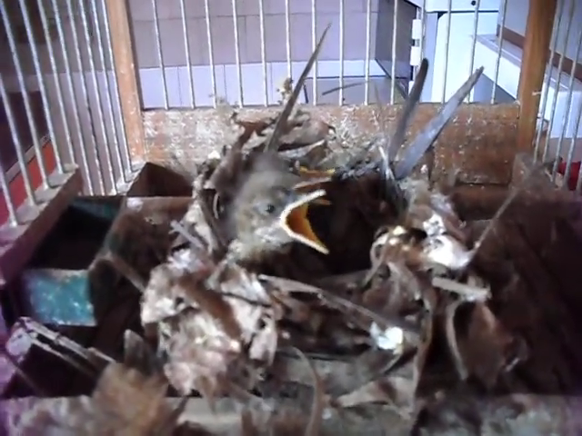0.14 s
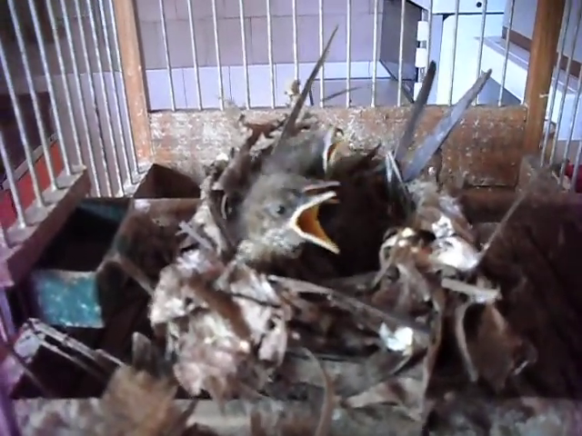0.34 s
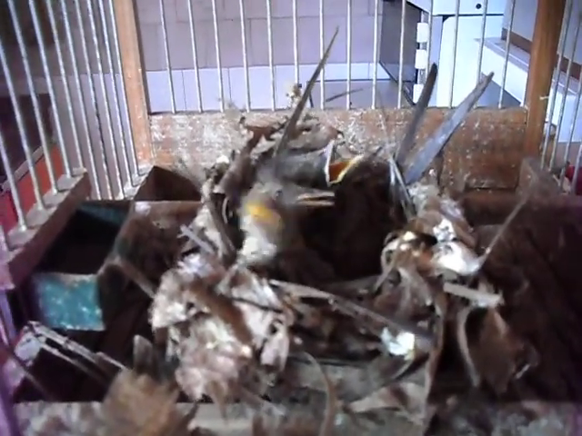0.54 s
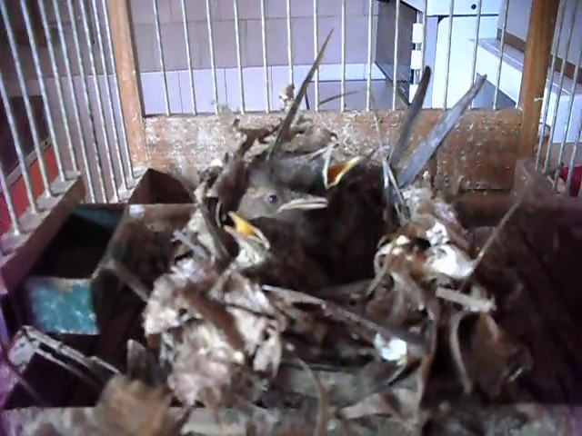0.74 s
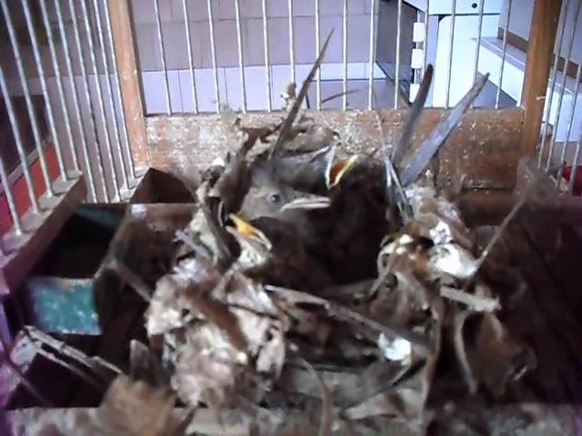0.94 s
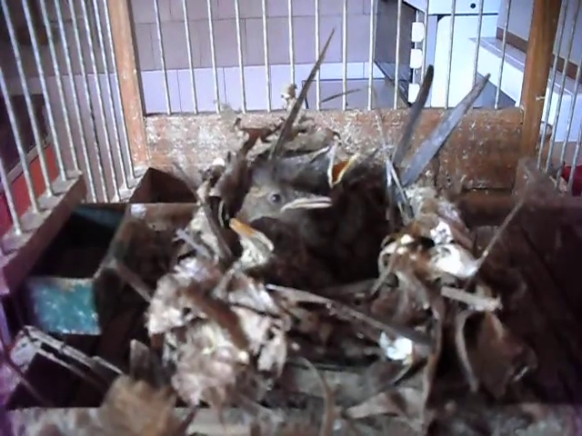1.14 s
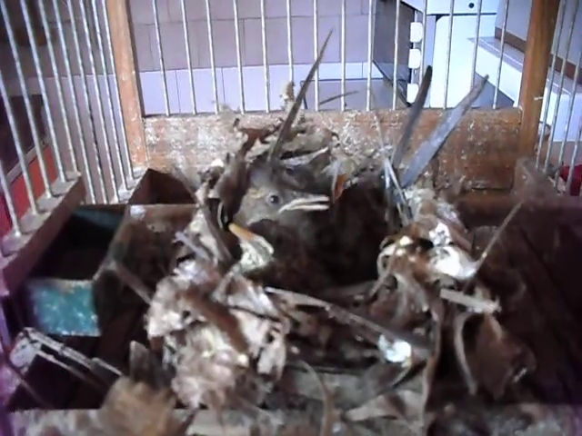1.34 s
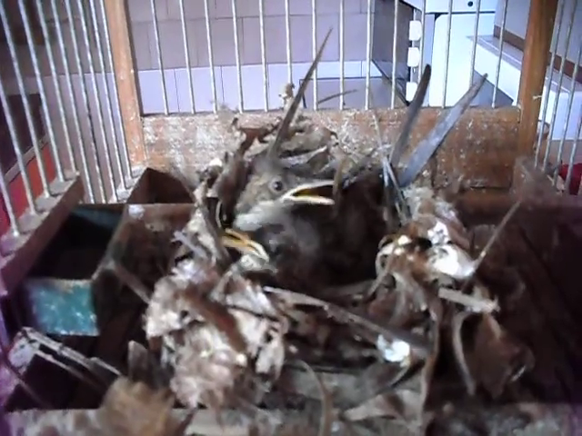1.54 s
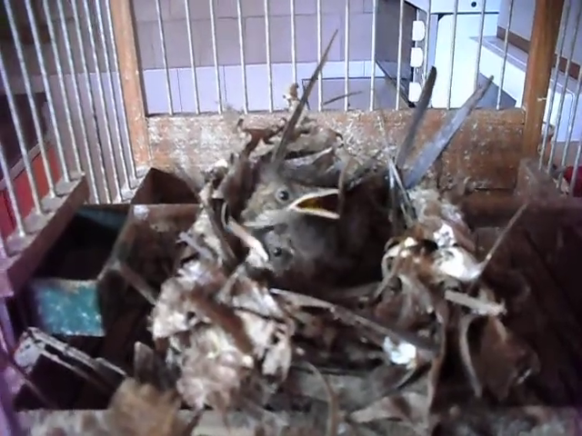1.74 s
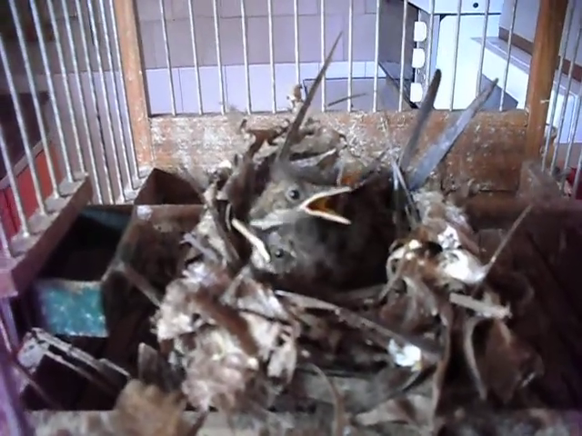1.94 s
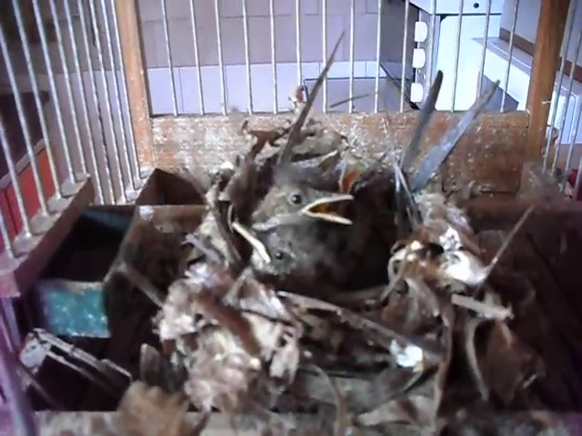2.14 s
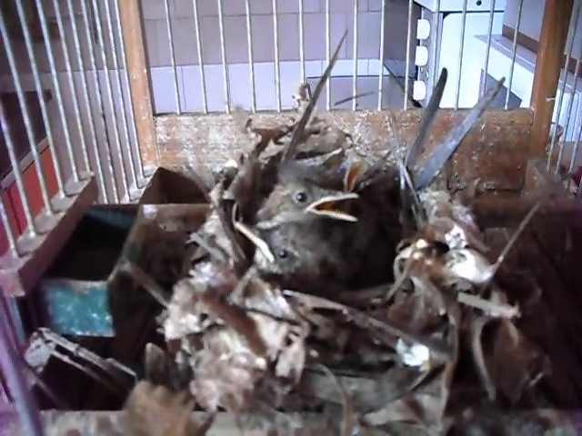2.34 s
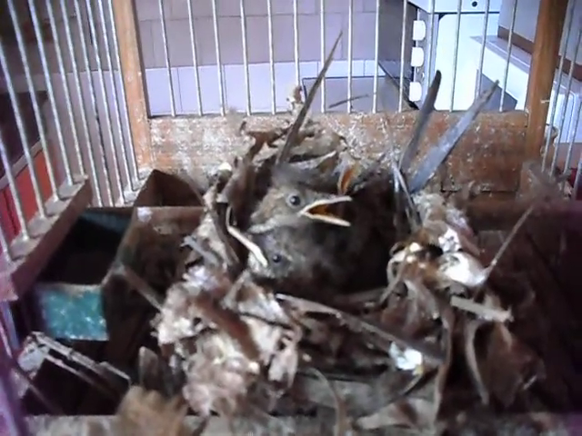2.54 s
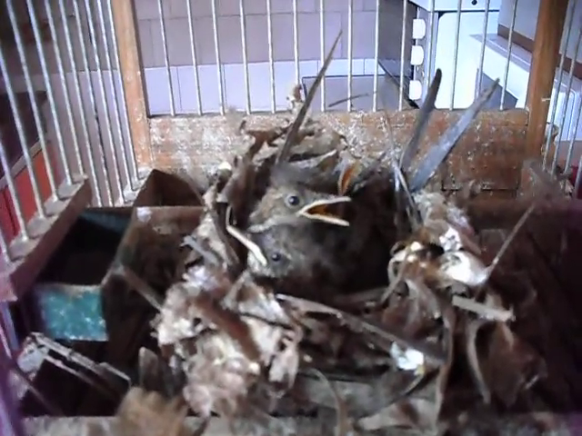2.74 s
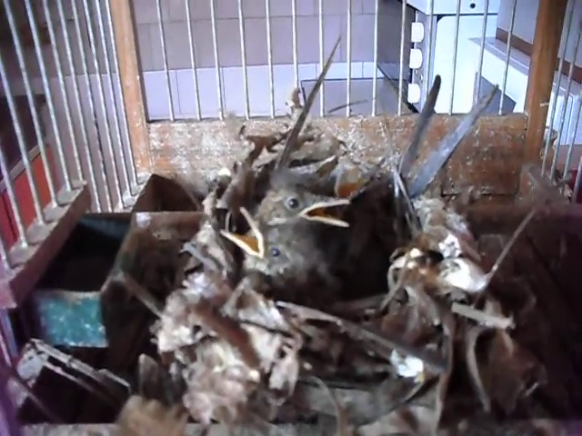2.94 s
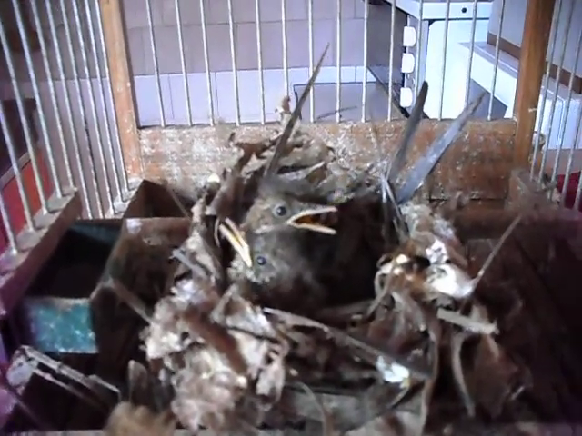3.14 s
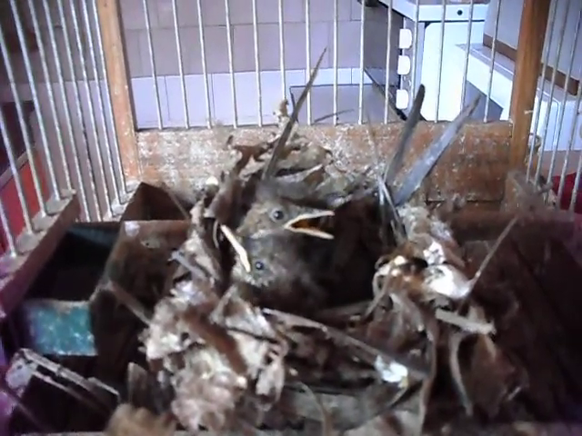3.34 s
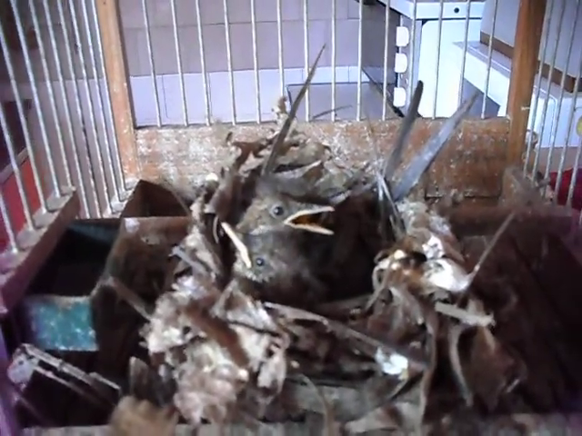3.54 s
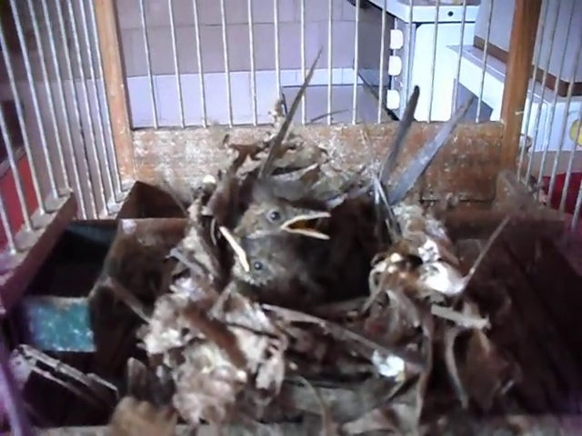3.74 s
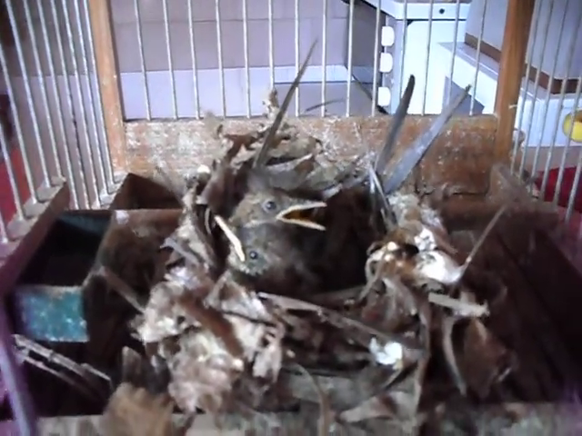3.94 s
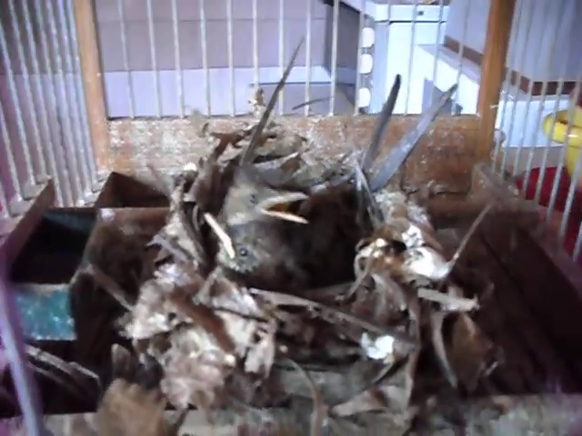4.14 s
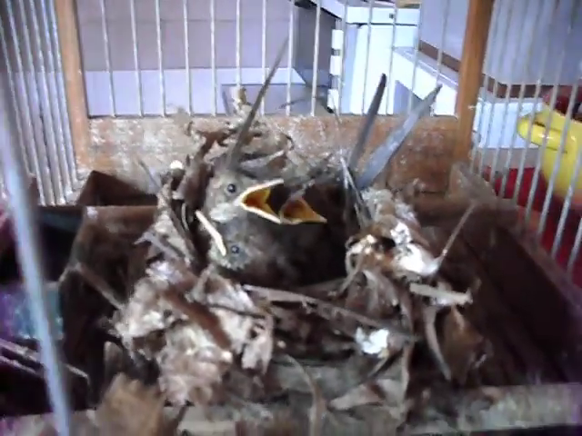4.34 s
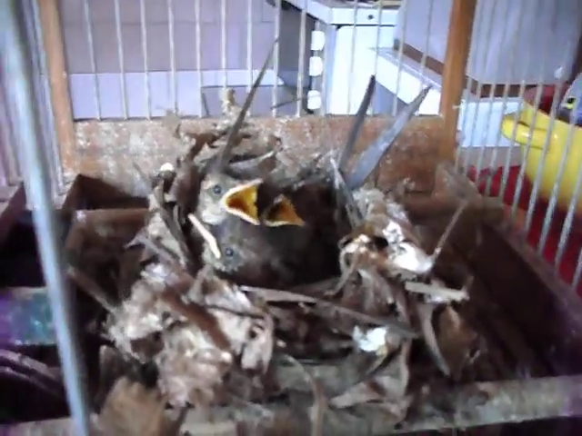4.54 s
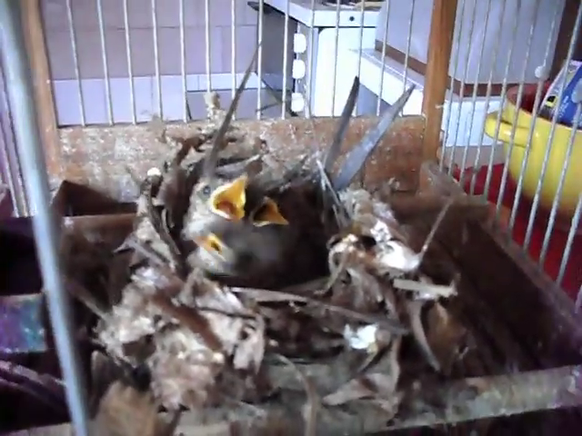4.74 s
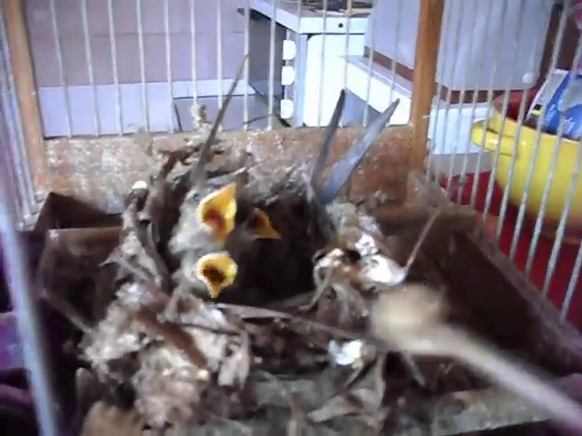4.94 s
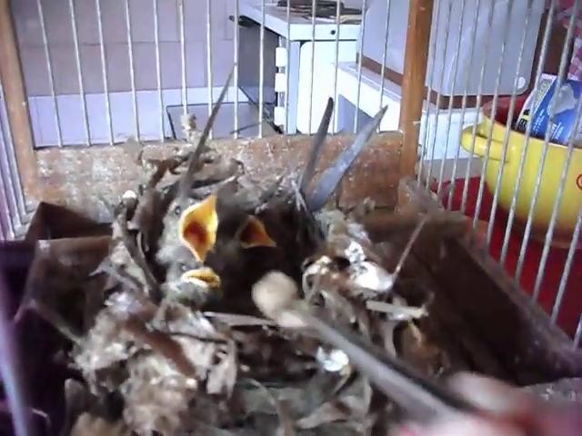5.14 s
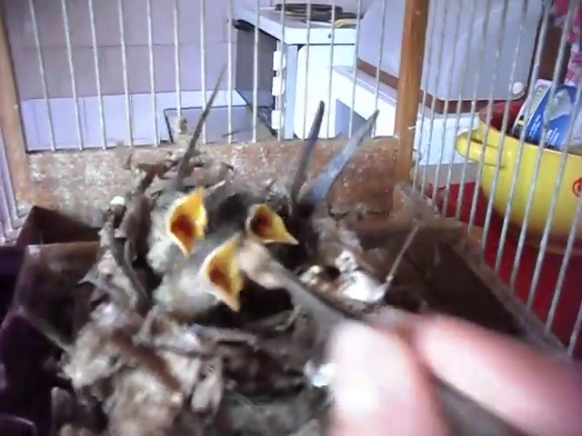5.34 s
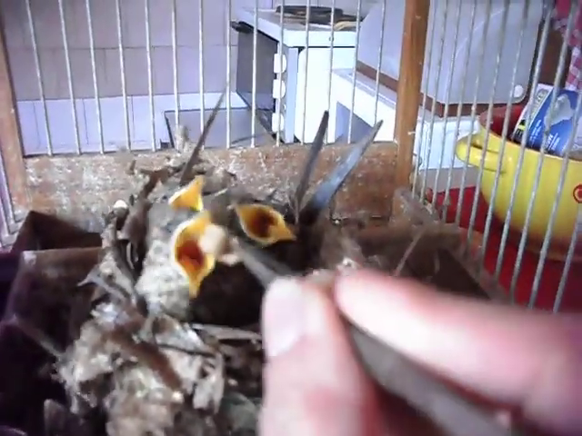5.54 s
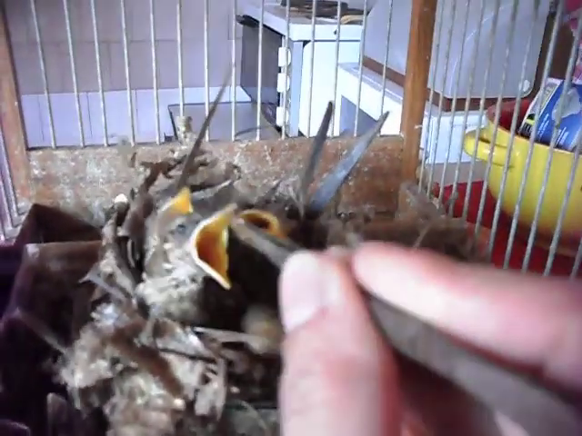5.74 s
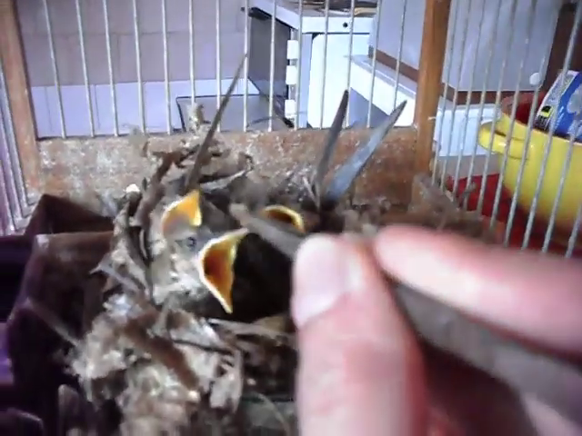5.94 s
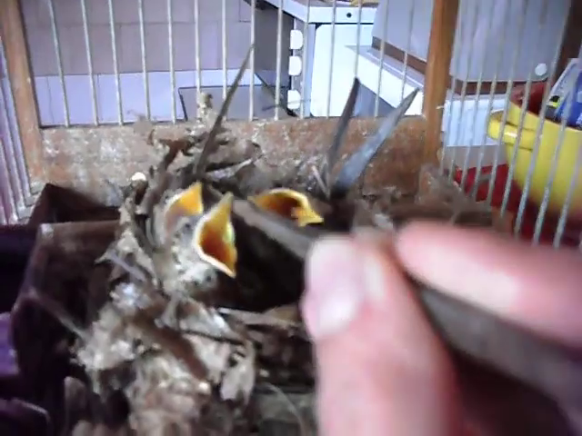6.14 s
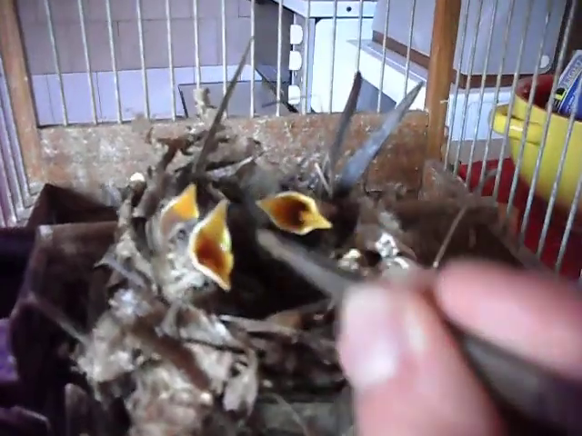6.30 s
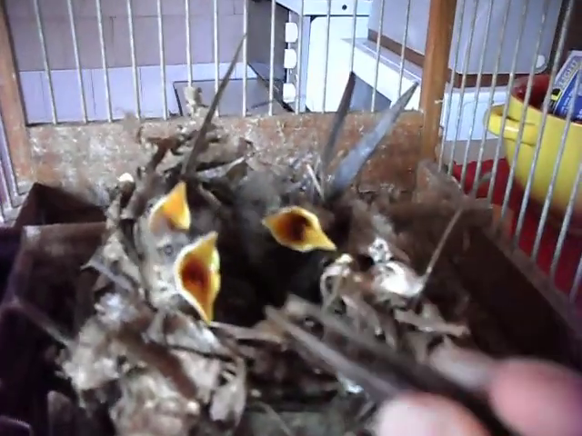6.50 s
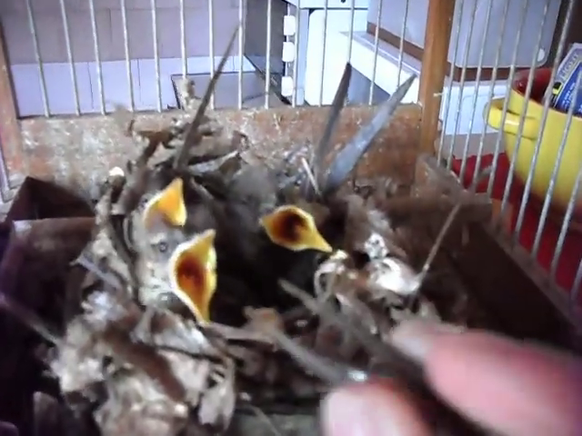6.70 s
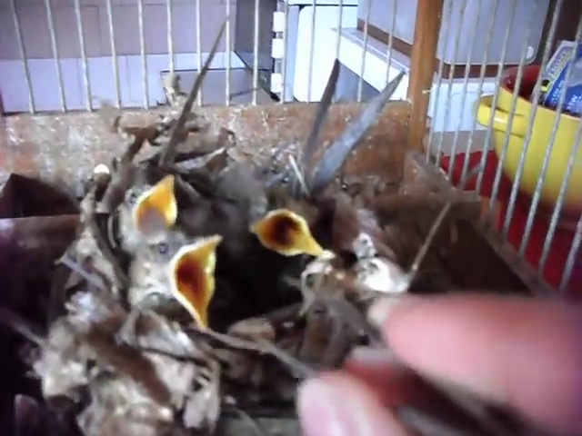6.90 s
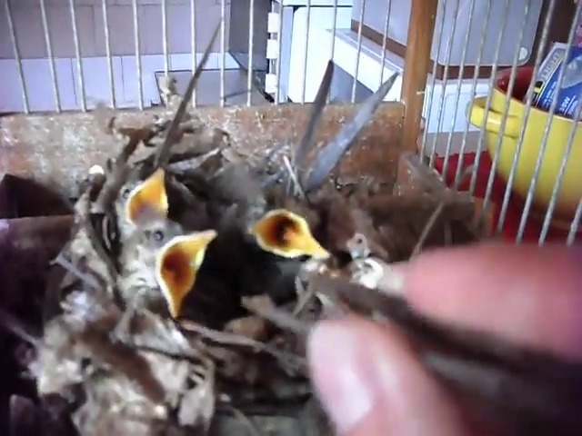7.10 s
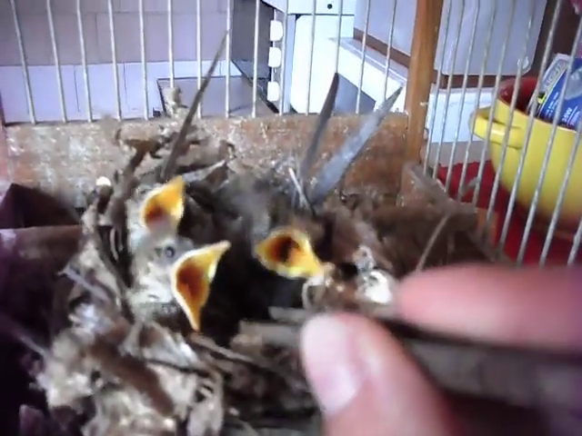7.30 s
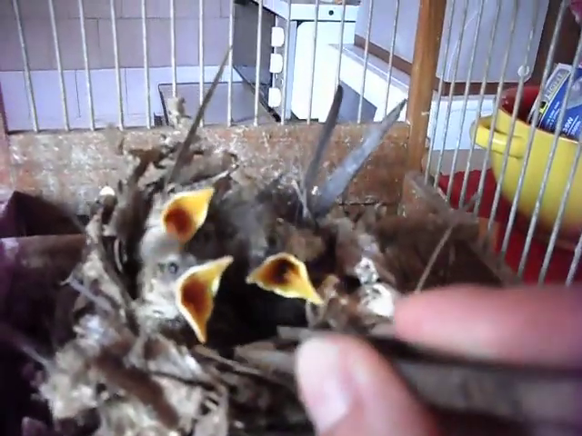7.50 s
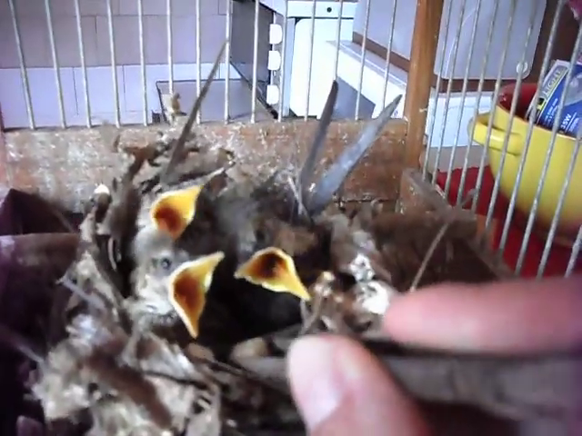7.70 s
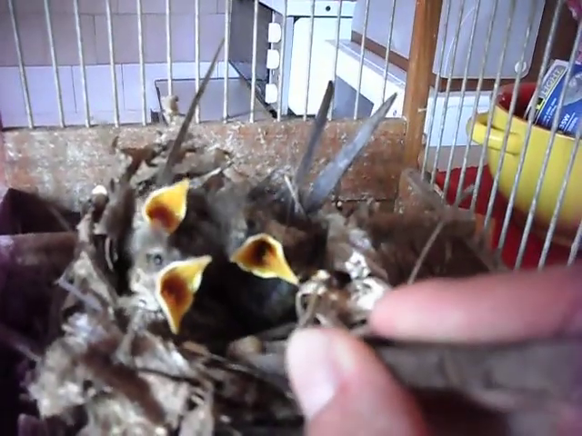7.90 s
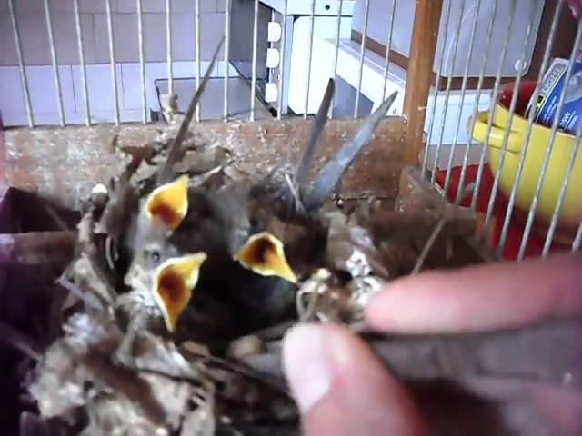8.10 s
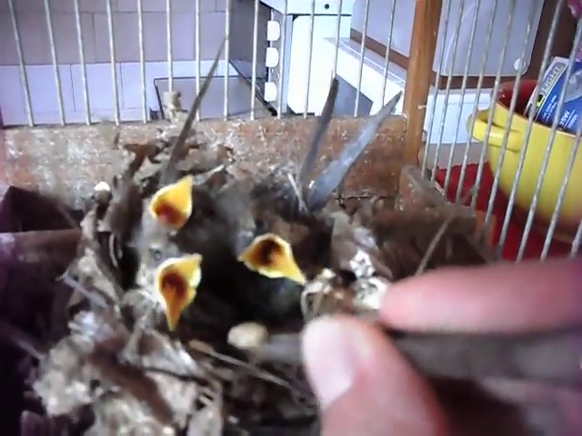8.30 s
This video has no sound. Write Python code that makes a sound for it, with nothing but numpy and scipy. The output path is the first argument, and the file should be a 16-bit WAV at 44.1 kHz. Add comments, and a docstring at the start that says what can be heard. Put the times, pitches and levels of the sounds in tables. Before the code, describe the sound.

Close, bright cheeping from chicks in a nest box: quick buzzy strokes sliding from very high pitch, a few thin held whistles, and quiet gaps. Later the calls crowd together at about fifteen a second or less, unbroken. Short box echoes, a small dry room, a modest microphone with dulled top and steady low rumble.

```python
"""Begging nestlings

Chicks in a nest chirp close by while tweezers offer food; their chirps overlap in a long late bout with a faint rasp.
In each chirp two syrinx voices swing in pitch some 33 times a second: a steep opening stroke, a full crown, dying arches.
Thin peeps are held whistles, faint slurs are falling tones, and two tweezer taps ring short damped modes.
Echoes off the nest box and decaying noise for a small room follow the sounds, over a low hum and hiss."""
import sys
import numpy as np
from scipy import signal
from scipy.fft import rfft, irfft, next_fast_len
from scipy.io import wavfile
from scipy.ndimage import uniform_filter1d

SR = 44100
rng = np.random.default_rng(int(sys.argv[2]) if len(sys.argv) > 2 else 0)


def persist_wave(psi):
    """Save psi, clipped to +-1, as 16-bit WAV."""
    counts = np.round(np.clip(psi, -1, 1) * 32767).astype(np.int16)
    wavfile.write(sys.argv[1], SR, np.atleast_2d(counts).T)


N = 373086  # samples in the scene

# Spectrum of the steady hiss and rumble before a rumble cut: frequency_hz, relative_density_db [dB per Hz]
FLOOR = [(12, -50), (20, 9), (37, -1), (54, -7), (315, -15), (441, -18.5), (503, -19), (705, -19),
         (1010, -20), (3270, -29.5), (6100, -32), (6600, -30.5), (8120, -34.5), (10000, -31), (13000, -42),
         (22000, -120)]
# Steady hum of an appliance: frequency_hz, rms_level_db
HUM = [(30.2, -50), (60.3, -59.5), (120.4, -73.5)]

# Begging chirps, one a row: first_apex_s, beat_s [apex to apex], opening_pitch_hz, crown_pitch_hz, opening_level_db,
# crown_level_db, fade_db [per later beat], lower_voice_relative_level_db, snap [0 drawn out - 1 clipped]
CHIRPS = [(.0452, 0.03, 11150, 9160, -15.5, -9, -19.5, -11, 0.15),
          (.2064, 0.037, 10720, 7240, -16, -18.5, -15, -10, 0.42),
          (.2214, 0.036, 11040, 9280, -17, -25, -25, -2, 0.46),
          (.3438, 0.022, 9100, 9900, -13, -25, -16, -3, 0.59),
          (.3734, 0.03, 9600, 8780, -32, -24.5, -13.5, -4, 0.16),
          (.500, 0.025, 7400, 6000, -6.5, -19.5, -26, -13.5, 0.72),
          (.529, 0.032, 10500, 8360, -22, -21, -17.5, -9, 0.2),
          (.687, 0.031, 9180, 8310, -27, -23.5, -34, -1.5, 0.015),
          (.847, 0.032, 9160, 8630, -22.5, -21, -29, -4.5, 0.53),
          (.9976, 0.028, 10120, 9820, -17, -15, -20, -10, 0.96),
          (1.117, 0.027, 8740, 7430, -16.5, -18, -10, -22, 0.38),
          (1.2664, 0.033, 9160, 7800, -25.5, -23, -23, -4, 0.075),
          (1.476, 0.028, 7140, 6600, -19.5, -21.5, -16, 1, 0.94),
          (2.015, 0.029, 8000, 8430, -30.5, -24.5, -27, -2, 0.037),
          (2.160, 0.03, 9400, 7970, -25.5, -23.5, -31, -2, 0.19),
          (2.796, 0.025, 7320, 7830, -22.5, -17, -39, -17, 0.27),
          (2.898, .0294, 10460, 9340, -26, -22, -34, 7, 0),
          (2.9274, 0.032, 8000, 9030, -47, -19, -28, 5, 0),
          (3.005, 0.03, 10500, 8470, -19.5, -19.5, -39, 4, 0.085),
          (3.113, 0.031, 10200, 7080, -9.5, -11.5, -24, -2, .75),
          (3.208, 0.026, 8700, 5950, -10.5, -42, -22, -4.5, 0.85),
          (3.2705, .025, 5050, 4550, -21, -23.5, -25, 8.5, 0.74),
          (4.175, 0.021, 7540, 8300, -21.5, -34, -42, -11, 0),
          (4.313, 0.029, 7960, 8590, -30, -24.5, -12.5, -3, 0.018),
          (4.670, 0.029, 11600, 10000, -31.5, -24.5, -34, 1, 0.27),
          (4.7856, 0.031, 11560, 10150, -17, -11.5, -18, -6.5, 0.053),
          (4.896, 0.023, 11640, 9880, -14, -10.5, -27, -5.5, 0.12),
          (5.047, 0.031, 10900, 9140, -13.5, -16, -29, 1.5, 0.5),
          (5.159, .0285, 8870, 7520, -10, -13.5, -15, -3.5, .7),
          (5.229, 0.039, 10160, 8400, -18.5, -31.5, -19, -3, 0.3),
          (5.314, 0.021, 8600, 8340, -22.5, -16, -19, -7.5, 0.051),
          (5.350, 0.016, 12300, 7920, -14, -16.5, -13, -7, 0),
          (5.3774, 0.025, 9020, 9000, -20, -20, -6, -13, 0.1),
          (5.4326, 0.041, 8800, 9040, -18, -21, -6, -22, 0.049),
          (5.4568, 0.027, 10600, 7960, -14.5, -19, -21, -9, 0.072),
          (5.541, 0.025, 11400, 11680, -19, -15.5, -10, -11.5, 0.098),
          (5.573, 0.028, 10450, 9300, -14, -15, -10, -11, 0.14),
          (5.677, 0.019, 11840, 11980, -19, -14, -14, -12.5, 0.083),
          (5.7126, 0.025, 10500, 8590, -17, -17.5, -8.5, -9.5, 0.0068),
          (5.810, 0.025, 11220, 11300, -19.5, -15, -19, -10, 0.023),
          (5.848, 0.026, 10830, 9200, -19, -17.5, -11, -7.5, 0.14),
          (5.933, .030, 12000, 10180, -17.5, -14.5, -24, -16, 0.027),
          (5.982, 0.027, 10650, 8800, -20.5, -20, -8, -7, 0.041),
          (6.055, 0.029, 11900, 10090, -17.5, -15.5, -20, -27, 0),
          (6.110, 0.026, 10900, 8340, -17.5, -16.5, -8, -17, 0.022),
          (6.179, 0.028, 11400, 9820, -15.5, -16, -18, -21, 0.058),
          (6.247, 0.028, 11600, 7920, -14.5, -16, -9.5, -14.5, 0.07),
          (6.299, 0.032, 12140, 10700, -13, -14, -22, -21, 0.18),
          (6.3814, 0.028, 11530, 8800, -14.5, -15.5, -9, -15, 0.19),
          (6.4278, 0.024, 12000, 10040, -21, -16.5, -27, -13, 0),
          (6.505, 0.025, 10900, 10920, -26.5, -17, -26, -4.5, .3),
          (6.555, .028, 11770, 9600, -12.5, -17, -29, -8, 0.23),
          (6.6334, .0258, 10950, 9800, -22.5, -35, -22, -24, 0.17),
          (6.675, 0.024, 10970, 9530, -13.5, -12.5, -15.5, -7.5, .05),
          (6.7824, 0.026, 11700, 9750, -29, -12.5, -18, -31, 0.13),
          (6.798, 0.033, 12030, 9220, -14.5, -7, -19.5, -11.5, 0.025),
          (6.933, 0.033, 11500, 9090, -10, -6.5, -23, -13, 0.023),
          (7.060, .030, 11030, 9280, -14, -11.5, -29, -15, 0),
          (7.0798, 0.03, 11740, 9620, -20, -14, -11.5, -10.5, 0.22),
          (7.181, .032, 11700, 10120, -15, -14, -24, -14, 0.059),
          (7.227, .029, 11480, 9740, -14.5, -14, -10.5, -14, 0.33),
          (7.300, 0.03, 11960, 9760, -18, -16.5, -38, -9, 0),
          (7.3726, .029, 11000, 8840, -17.5, -19, -7.5, -8, 0.08),
          (7.431, 0.031, 11870, 8020, -16.5, -26.5, -25, -17, 0.087),
          (7.522, 0.027, 10700, 8740, -15.5, -17, -8, -10.5, 0.17),
          (7.570, 0.027, 11020, 7200, -16.5, -28, -18, -17, 0),
          (7.665, 0.026, 10480, 8000, -15, -17.5, -8, -12, 0),
          (7.703, 0.018, 11100, 8240, -16.5, -21, -32, -13, 0.0094),
          (7.814, 0.028, 10640, 8250, -17.5, -18, -19.5, -20, 0),
          (7.834, .032, 11470, 9200, -15.5, -19.5, -25, -5, 0.043),
          (7.9542, 0.029, 11200, 8850, -18.5, -18, -17.5, -18, 0),
          (7.970, 0.031, 11370, 8900, -15, -12, -23.5, -8, 0),
          (8.1136, .028, 10800, 8500, -15.5, -14, -14, -9.5, 0.14),
          (8.249, 0.03, 11800, 9550, -17.5, -13, -12.5, -9.5, 0.0083),
          (8.305, 0.029, 11110, 6620, -16, -24, -20, -6.5, 0.11),
          (8.3786, 0.031, 11530, 7600, -16.5, -23, -25, -8, 0.015),
          (8.427, 0.032, 10260, 9320, -16.5, -12, -20, -7, 0.087)]
# Basic shapes of the three kinds of arch, before snap and scatter: fall_s, rise_s, lead_s [sounding before the apex],
# lag_s [loudest after the apex], swell_s, fade_s, lower_pitch_share [of the upper voice], lower_level_shift_db
OPENING_SHAPE = (.008, .008, .005, .0041, .0028, .0024, .76, -2.3)
CROWN_SHAPE = (.0098, .011, 0.016, 0.0026, 0.0067, 0.0028, .83, 1)
DYING_SHAPE = (0.0073, .009, 0.015, 0.0011, .013, 0.0054, 0.67, 4.9)
# Resonances of throat and beak: frequency_hz, gain_db
THROAT = [(1300, -0.5), (1650, -8), (2400, 2), (3000, -6), (3500, -5.5), (3850, -7), (4250, 1.5),
          (5200, -3.5), (5700, -5.5), (6600, -1), (7500, 0.5), (8300, 1.5), (9500, 2.5)]
# Air hissing through the beak: frequency_hz, relative_density_db [dB per Hz]
AIR = [(600, -11), (1300, -1.5), (2100, 3.5), (4500, 14), (7000, -11.5), (9500, 12.5), (12300, 14.5),
       (14000, -46)]
# Two ringing bands of a half-closed beak in the crack of a clipped chirp: frequency_hz, relative_density_db [dB per Hz]
CRACK_COLOUR = [(600, -40), (1300, -9), (1700, -7), (2400, 2), (3100, -7), (4700, 0), (5800, -9),
                (6800, -8), (9000, -26)]

# Falling slurs of a resting chick: start_s, starting_pitch_hz, level_db
SLURS = [(1.417, 9100, -43.5), (1.778, 6210, -44.5), (2.312, 6600, -48), (2.486, 6470, -45.5),
         (3.452, 6424, -47), (3.606, 6330, -45.5), (3.755, 6200, -45.5), (3.876, 9800, -36.5),
         (4.053, 6500, -44.5)]
# Held whistles, one voice a row: start_s, swell_s, fade_s, first_pitch_hz, held_pitch_hz, final_pitch_hz, peak_level_db
PEEPS = [(1.848, .008, .02, 5370, 4540, 4600, -46), (1.877, 0.013, 0.025, 6870, 6660, 6350, -22.5),
         (2.767, 0.047, 0.023, 8300, 7620, 7250, -11.5), (2.767, 0.04, 0.027, 8400, 9100, 7900, -16.5),
         (2.822, 0.0091, 0.029, 7170, 6600, 6400, -25), (4.194, 0.0069, 0.023, 7500, 6630, 6300, -26),
         (4.975, 0.039, 0.035, 3800, 3760, 3720, -51), (5.276, .013, .013, 4300, 5400, 4200, -31),
         (8.089, 0.027, .038, 8450, 8745, 7860, -7.5), (8.089, 0.03, 0.034, 7500, 7050, 6850, -15.5)]
# Path of the hoarse, drawn-out rasp: time_s, centre_hz, rms_level_db
RASP_PATH = [(5.3, 3750, -53), (5.402, 3750, -46), (5.662, 3600, -46), (5.819, 3650, -44.5),
             (5.98, 2800, -41), (6.202, 2500, -40.5), (6.4, 2800, -43.5), (6.52, 3200, -40),
             (6.66, 3600, -43.5), (6.72, 3700, -51)]
# Tweezers tapping a beak: start_s, level_db
TAPS = [(6.1762, -19.5), (7.0718, -20)]
# Damped modes of a tap: frequency_hz, relative_level_db, t60_s
TAP_MODES = [(1520, -16, 0.024), (1770, -6.5, 0.017), (2730, -5, 0.015), (4100, -1, 0.0083),
             (6000, -1, 0.0071)]

# Reverberation time of the room's main tail: frequency_hz, t60_s
ROOM_T60 = [(1500, 0.041), (4000, 0.068), (7500, 0.13), (10400, 0.15)]
# Colour of what reaches the room: fuller near 3 kHz and at the very top, leaner near 9 kHz: frequency_hz, gain_db
ROOM_COLOUR = [(2300, 6.5), (3200, 12.5), (5000, 6), (7000, 2.5), (9000, -0.5), (11500, 7)]
# Microphone response, falling steeply above 10 kHz: frequency_hz, gain_db
MICROPHONE = [(1000, -2), (8700, 1.5), (10100, -2.5), (10550, -8.5), (10950, -22.5), (11500, -29),
              (12150, -32), (12800, -33), (15000, -55)]
# Colour of the treble mirrored about a quarter of the sample rate: frequency_hz, gain_db
MIRROR = [(10600, -54), (11100, -3), (11700, -14.5), (12300, -35), (12700, -50), (13300, -95)]

FLOOR_DB = -49.5  # rms level of the hiss and rumble
BAND_LIMIT_HZ = 15900
LOWEST_HZ = 1474.7  # the typical pitch to which a drawn-out chirp's slackening syrinx tends
DYING_PITCH = .76  # each arch after the crown reaches this share of the last one's pitch
SCATTER = .07  # spread of the arches' fall times and of the interval between the voices
# Full-snap factors of the sweep and sounding times, the swell and the lower voice's pitch share; full-snap lag in s
SNAP_SWEEP, SNAP_SWELL, SNAP_SHARE, SNAP_LAG_S = .6, 0.088, .8, 0.0043
# A tiny beak radiates little below this cut-off
NO_BASS = signal.butter(4, 1900, "high", fs=SR, output="sos")


def gain_of(db):
    """Logarithmic level: twenty decibels are a factor of ten in amplitude."""
    return 10 ** (np.asarray(db) / 20)


def evened(x):
    """Power normalisation: the signal is scaled to an rms of 1."""
    return x / np.sqrt(np.mean(x ** 2) + 1e-20)


def read(points, hz):
    """Logarithmic interpolation: a table is read along a log-frequency axis."""
    f, value = np.transpose(points)
    return np.interp(np.log(hz + 1), np.log(f + 1), value)


def add(mix, s, sound):
    """Superposition: pressures add where a sound enters the mix at time s."""
    part = mix[max(round(s * SR), 0):][:len(sound)]
    part += sound[:len(part)]


def coloured(x, points):
    """Linear filtering: each frequency is weighted by a table of frequency_hz, gain_db."""
    size = next_fast_len(len(x) + 2048)
    gain = gain_of(read(points, np.fft.rfftfreq(size, 1 / SR)))
    return irfft(rfft(x, size) * gain, size)[:len(x)]


def waver(count, size):
    """Smoothed chance: two moving averages leave slow noise of rms 1 that changes over size samples."""
    once = uniform_filter1d(rng.standard_normal(count), size)
    return evened(uniform_filter1d(once, size))


def background():
    """Stationary sound: shaped noise makes hiss and rumble, and sines make the hum."""
    t = np.arange(N) / SR
    hum = sum(np.sqrt(2) * gain_of(db) * np.sin(2 * np.pi * (hz * t + rng.random())) for hz, db in HUM)
    noise = coloured(rng.standard_normal(N), FLOOR)
    noise = signal.sosfilt(signal.butter(2, 45, "high", fs=SR, output="sos"), noise)
    return hum + gain_of(FLOOR_DB) * evened(noise)


def voice(hz, jitter, overtone_db=-34):
    """Membrane vibration: one side of the syrinx is a clean tone with faint overtones and a slightly trembling pitch."""
    trembling_hz = hz * (1 + jitter * waver(len(hz), size=20))
    phase = 2 * np.pi * (np.cumsum(trembling_hz) / SR + rng.random())
    overtones = sum(gain_of(overtone_db * (k - 1)) * (k * hz < SR / 2) * np.sin(k * phase) for k in range(2, 4))
    return np.sin(phase) + overtones


def bend(t, top_hz, sweep, snap, snap_lift=1.12, rest_scatter=0.0698, wobble=0.0311):
    """Tension and pitch: the syrinx tightens and lets go, wandering more when slack; a clipped chirp rests higher."""
    tension = 1 / (1 + (t / sweep) ** 2 / 2) ** 2
    rest_hz = LOWEST_HZ * snap_lift ** snap * np.exp(rest_scatter * rng.standard_normal())
    pitch = rest_hz + (top_hz - rest_hz) * tension
    return pitch * (1 + wobble * (1 - tension) * waver(len(t), size=110))


def push(t, swell, fade, lead_in=0.48):
    """Driving air pressure: a soft lead-in, a quick swell to t = 0, then a roughly exponential fade."""
    rise = (1 - lead_in) * np.exp(-(t / swell) ** 2) + lead_in * np.exp(-abs(t) / (swell + 0.00096))
    return np.where(t < 0, rise, 1 / np.cosh(np.clip(t / fade, 0, 50)))


def driven_voice(hz, pressure):
    """Amplitude modulation: air pressure sets the strength of a membrane's tone."""
    return pressure * voice(hz, jitter=0.018, overtone_db=-29.5)


def crack(t, top_hz, crack_db=-10, swell=0.00084, fade=0.0019, reach=0.95):
    """Transient noise: a clipped chirp breaks into a short burst, low-passed near the top pitch of its arch."""
    noise = evened(coloured(rng.standard_normal(len(t)), CRACK_COLOUR))
    low_pass = signal.butter(3, min(reach * top_hz, SR / 3), fs=SR, output="sos")
    return gain_of(crack_db) * push(t, swell, fade) * signal.sosfilt(low_pass, noise)


def beak(sound, snap, db, ring_db=3, ring_hz=5400, shut_db=-5, gape_db=-2, low_hz=2200, gape_per_db=0.3479,
         usual_db=-18, pose_db=1.5, count=9):
    """Radiation and resonance: a wide gape favours the treble; a half-shut beak rings lower and muffles the top."""
    # the harder a chick begs, the wider it gapes
    thin_db = (gape_db - gape_per_db * (db - usual_db)) * (1 - snap)
    gape = [(low_hz / 2, gape_db), (low_hz, thin_db), (2 * low_hz, 0),
            (ring_hz, ring_db * snap), (2 * ring_hz, shut_db * snap)]
    hz = np.geomspace(low_hz / 2, 2 * ring_hz, 2 * count)
    # every pose of the head adds a little colour of its own
    pose = pose_db * np.clip(rng.standard_normal(len(hz)), -2, 1)
    return coloured(sound, np.transpose([hz, read(gape, hz) + pose]))


def arch(s, shape, top_hz, db, lower_db, snap, lower_sweep=.8, lower_lag=0.086, lower_fade=1.327, coupling_db=-22,
         linger_db=-19, linger_limit_db=-39, linger=0.73, linger_lag=1.73):
    """Coupled oscillators: two voices sweep one arch; the lower is narrower and outlasts the upper on the way down."""
    fall, rise, lead, lag, swell, fade, share, shift_db = shape
    slow, apart = np.exp(SCATTER * np.clip(rng.standard_normal(2), -2, 2))
    # a clipped chirp sweeps faster, swells abruptly on the way down, and its voices lie further apart
    hurry = SNAP_SWEEP ** snap
    fall, rise, fade, lead = fall * slow * hurry, rise * hurry, fade * hurry, lead * hurry
    lag = lag + (SNAP_LAG_S - lag) * snap
    swell = swell * SNAP_SWELL ** snap
    lower_hz = top_hz * share * apart * SNAP_SHARE ** snap
    lower_db = lower_db + shift_db

    t = np.arange(-SR // 50, SR // 28) / SR
    sweep = np.where(t < 0, rise, fall)
    # the syrinx only starts to sound on its way up to the top of the arch
    pressure = gain_of(db) * np.exp(-(np.minimum(t, 0) / lead) ** 4)
    upper = driven_voice(bend(t, top_hz, sweep, snap), pressure * push(t - lag, swell, fade))

    # the last of the air keeps the lower voice going softly as its pitch settles
    last_air = gain_of(min(db + linger_db, linger_limit_db)) * np.exp(-((t / fall - linger_lag) / linger) ** 2)
    lower_push = gain_of(lower_db) * push(t - lag - lower_lag * fall, swell, lower_fade * fade)
    lower = driven_voice(bend(t, lower_hz, sweep * lower_sweep, snap), pressure * lower_push + last_air)

    # the two sides shake each other, which adds their sum and difference tones
    product = gain_of(coupling_db - db - lower_db / 2) * upper * lower
    coupled = signal.sosfilt(NO_BASS, product)
    burst = snap * gain_of(db) * crack(t - lag, top_hz)
    return s + t[0], beak(upper + lower + coupled + burst, snap, db)


def chirp(row, count=2):
    """Repeated modulation: an opening stroke, a crown, then lower-pitched dying arches follow a beat apart."""
    s, beat, opening_hz, crown_hz, opening_db, crown_db, fade_db, lower_db, snap = row
    swings = [(OPENING_SHAPE, opening_hz, opening_db), (CROWN_SHAPE, crown_hz, crown_db)]
    for k in range(1, count + 1):
        swings.append((DYING_SHAPE, crown_hz * DYING_PITCH ** k, crown_db + fade_db * k))
    return [arch(s + k * beat, *swing, lower_db, np.clip(snap, 0, 1)) for k, swing in enumerate(swings)]


def turbulence(song, hiss, air_db=-20, growth=0.91, usual_db=-20):
    """Flow noise: membranes chop the air, and hiss follows their speed, so high notes carry the most."""
    speed = np.diff(song, prepend=0)
    strength = np.sqrt(abs(uniform_filter1d(speed ** 2, size=130))) / gain_of(usual_db)
    return gain_of(air_db + usual_db) * strength ** growth * hiss


def room(x, box_db=-7, box_time=.0035, room_db=-8, late_db=-24, late_t60=0.52, gap=0.0055, lowest_hz=300):
    """Reflection and decay: direct sound, nest-box echoes, the room's short tail and a faint longer one."""
    t = np.arange(SR // 3) / SR
    box = np.zeros(len(t))
    box[(SR * box_time * rng.uniform(.1, 1, size=8)).astype(int)] = rng.choice([-1, 1], size=8)

    # the decay rate of the short tail depends on frequency
    hz, age, z = signal.stft(rng.standard_normal(len(t)), SR, nperseg=256)
    decay = np.exp(-np.log(1000) * age / read(ROOM_T60, hz)[:, None])
    tail = signal.istft(z * decay, SR, nperseg=256)[1][:len(t)]
    tail *= np.clip(t / gap - .5, 0, 1)

    late = rng.standard_normal(len(t)) * np.exp(-np.log(1000) * t / late_t60) * (t > gap)
    parts = ((box_db, box), (room_db, tail), (late_db, late))
    echoes = sum(gain_of(db) * part / np.linalg.norm(part) for db, part in parts)
    heard = x + signal.oaconvolve(x, coloured(echoes, ROOM_COLOUR))[:N]
    # such small sources radiate no bass
    return signal.sosfilt(signal.butter(2, lowest_hz, "high", fs=SR, output="sos"), heard)


def begging(count=4):
    """Source position: the heads keep moving, so successive chirps reach the room from different places."""
    places = np.zeros((count, N))
    for k, row in enumerate(CHIRPS):
        for swing in chirp(row):
            add(places[k % count], *swing)
    hiss = evened(coloured(rng.standard_normal(N), AIR))
    heard = sum(room(place + turbulence(place, hiss)) for place in places)
    return coloured(heard, THROAT)


def slur(row, rest_hz=3900, sink=0.006, swell=0.00092, fade=0.0065):
    """Exponential relaxation: a weak note slides down towards a resting pitch and fades."""
    s, hz, db = row
    t = np.arange(SR // 30) / SR
    pitch = rest_hz + (hz - rest_hz) * np.exp(-t / sink)
    return s, gain_of(db) * push(t - 2 * swell, swell, fade) * voice(pitch, jitter=0.023)


def peep(row, droop=4.2, fullness=1.05, hook_s=0.00372, jitter=0.0069):
    """Sustained oscillation: a whistle hooks onto its pitch, swells, then bends to its final pitch as it dies."""
    start, swell, fade, first_hz, hz, final_hz, db = row
    t = np.arange(0, swell + fade, 1 / SR)
    hook = (first_hz - hz) * np.exp(-t / hook_s)
    pitch = hz + hook + (final_hz - hz) * (t / t[-1]) ** droop
    angle = np.interp(t, [0, swell, swell + fade], [0, np.pi / 2, np.pi])
    pressure = abs(np.sin(angle)) ** fullness
    return start, gain_of(db) * pressure * voice(pitch, jitter)


def rasp(width_hz=380, grain=0.26):
    """Frequency translation: low-passed complex noise is moved to a gliding centre, making a grainy hoarse band."""
    t = np.arange(N) / SR
    s, hz, db = np.transpose(RASP_PATH)
    noise = rng.standard_normal(N) + 1j * rng.standard_normal(N)
    band = signal.sosfilt(signal.butter(2, width_hz, fs=SR, output="sos"), noise)
    carrier = np.exp(2j * np.pi * np.cumsum(np.interp(t, s, hz)) / SR)
    band = evened((band * carrier).real * (1 + grain * waver(N, size=90)))
    return band * gain_of(np.interp(t, s, db)) * (t > s[0]) * (t < s[-1])


def tap(row):
    """Modal impact: a tiny knock rings a few short, exponentially damped modes."""
    s, db = row
    t = np.arange(SR // 20) / SR
    ringing = sum(gain_of(level) * np.exp(-np.log(1000) * t / t60) * np.sin(2 * np.pi * hz * t)
                  for hz, level, t60 in TAP_MODES)
    return s, gain_of(db) * ringing


def small_sounds():
    """Superposition in a shared space: slurs, peeps and tweezer taps receive the same reflections."""
    mix = np.zeros(N)
    for table, source in ((SLURS, slur), (PEEPS, peep), (TAPS, tap)):
        for row in table:
            add(mix, *source(row))
    return room(mix, box_db=-9, room_db=-20, late_db=-20, lowest_hz=1090)


def scene():
    """Linear superposition: the background, chirps, small sounds and rasp add in one channel."""
    return (background() + begging() + small_sounds() + rasp())[None]


def record(dry, ceiling=0.68, low_ceiling=0.85, knee=14):
    """Transduction: microphone colour, a faint spectral mirror, lopsided overload of loud peaks and a band limit."""
    x = coloured(dry[0], MICROPHONE)
    # alternating the sign of samples mirrors the spectrum about a quarter of the sample rate
    x = x + coloured(x * np.cos(np.pi * np.arange(N)), MIRROR)
    limit = np.where(x > 0, ceiling, low_ceiling)
    x = x / (1 + abs(x / limit) ** knee) ** (1 / knee)
    low_pass = signal.firwin(511, BAND_LIMIT_HZ, window=("kaiser", 9), fs=SR)
    return signal.oaconvolve(x, low_pass, "same")[None]


dry = scene()
out = record(dry)
persist_wave(out)
```